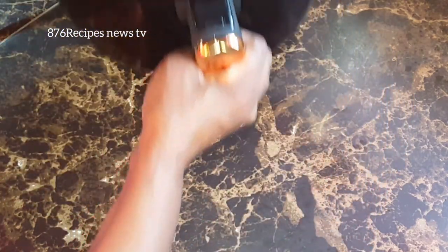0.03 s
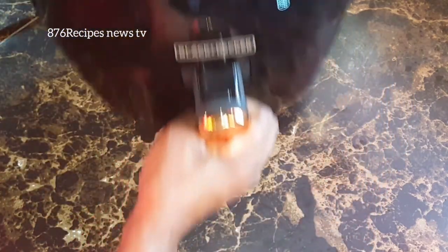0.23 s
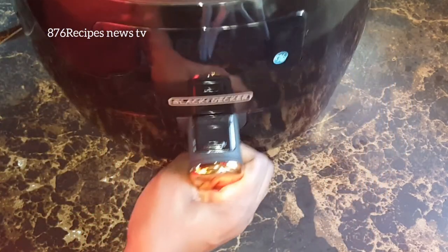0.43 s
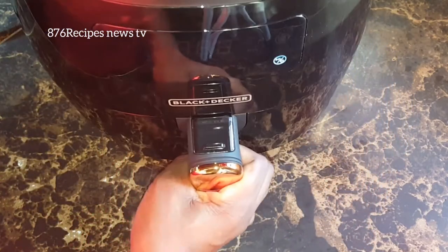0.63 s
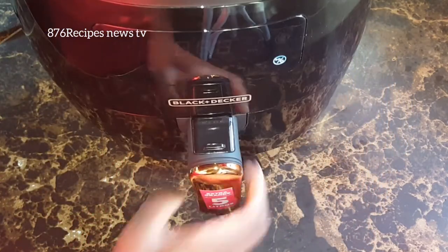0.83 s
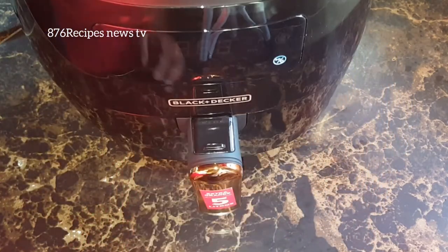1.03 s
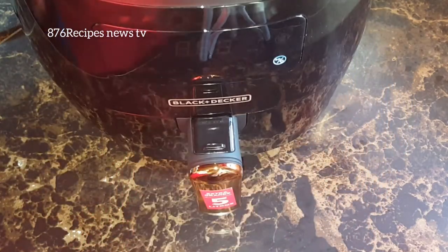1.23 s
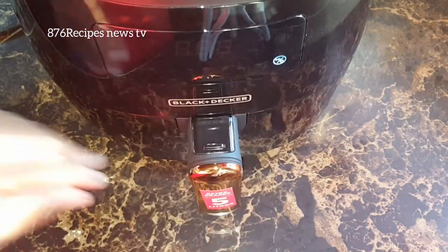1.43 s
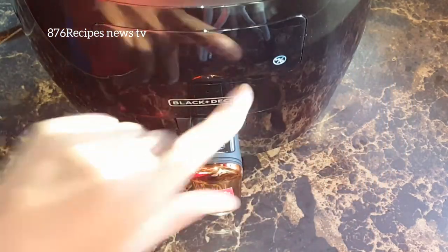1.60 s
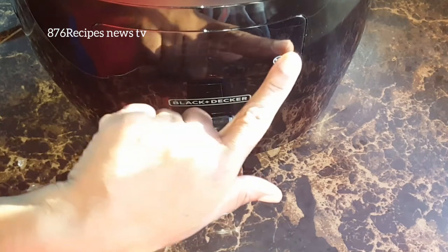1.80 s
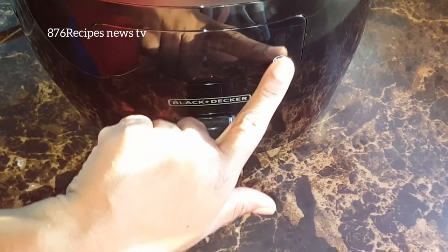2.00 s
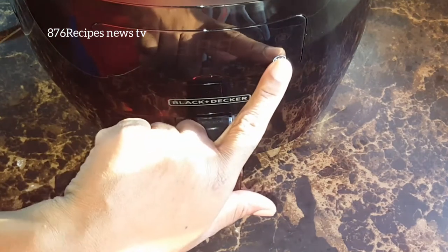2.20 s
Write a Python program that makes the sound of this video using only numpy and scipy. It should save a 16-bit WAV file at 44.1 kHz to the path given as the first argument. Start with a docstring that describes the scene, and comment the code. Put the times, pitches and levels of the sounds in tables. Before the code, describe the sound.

An air fryer basket is pushed shut, starting with a light bump and a low scrape. It knocks twice, near 0.25 and 0.45 seconds, with a hollow plastic boom, a rattling pan and ticking catches, echoing briefly in a small kitchen. Faint handle ticks and a soft brush of fingers follow until about 1.2 seconds. Quiet room noise and a faint, wavering low hum remain until 2.3 seconds.

```python
"""An air fryer basket is pushed home on a stone worktop. It starts with a light bump and scrapes along its
rails, then knocks twice, near 0.25 s and 0.45 s. Each knock is a cluster of blows that ring the hollow
plastic housing and rattle the pan, while catches tick and the fryer rocks on its feet. The basket seats,
the handle ticks and fingers brush off it. A small kitchen echoes it all, and at the end only the
background is left: steady room noise, a faint hum and a low drone that swells and fades."""
import sys
import numpy as np
from scipy import signal
from scipy.fft import rfft, irfft
from scipy.io import wavfile
from scipy.ndimage import uniform_filter1d

SR = 44100
rng = np.random.default_rng(int(sys.argv[2]) if len(sys.argv) > 2 else 0)


def wrap_up_sound(samples):
    """Save the sound to the file named by the first command line argument, as 16-bit audio."""
    columns = np.atleast_2d(samples).T
    # keep every value between -1 and 1, then stretch to whole-number steps
    tamed = np.clip(columns, -1, 1)
    steps = np.round(tamed * 32767).astype(np.int16)
    wavfile.write(sys.argv[1], SR, steps)


N = 103635

# blows of the basket: start_s, housing_db, pan_db, clatter_db, dull_above_hz, favoured_pan_hz
KNOCKS = [(0.002, -22.5, -26, -34, 300, 314), (0.175, -29, -32, -24.5, 4000, 516),
          (0.209, -26, -42, -24.5, 1670, 560), (0.2369, -8.5, 0.5, -3.5, 1180, 450),
          (0.243, -13.5, -1, -4, 6360, 900), (0.2560, 1.5, 2.5, -2, 500, 373),
          (0.267, -12.5, -3.5, -7, 4030, 604), (0.278, -4.5, -4.5, -11, 500, 560),
          (0.3903, 1, 5.5, -1.5, 1520, 512), (0.395, -12.5, 1, -1.5, 3800, 2170),
          (0.411, -6, 8.5, -18, 700, 670), (0.425, -3.5, -24, -8, 2010, 410),
          (0.4412, -12, -31, -17, 1510, 700), (0.4652, 0.5, -32, -11, 1300, 400),
          (0.488, -22, -1, -8, 4100, 296), (0.4995, -4, 9.5, -2, 870, 566),
          (0.545, -15, -12.5, -15.5, 590, 300), (0.655, -12.5, -11, -21, 580, 327)]


def undb(db):
    """Turn decibels into a number to multiply by."""
    return 10 ** (np.asarray(db) / 20)


def at_hz(points, hz):
    """Read a curve of (pitch_hz, value) points, with every octave equally wide."""
    points = np.array(points, float)
    return np.interp(np.log(hz + 1), np.log(points[:, 0]), points[:, 1])


def over_time(points):
    """Read a curve of (time_s, value) points at every sample."""
    return np.interp(np.arange(N) / SR, *np.array(points).T)


def bins():
    """The frequencies in a spectrum of the whole sound."""
    return np.arange(N // 2 + 1) * SR / N


def noise(gain):
    """Stereo noise of strength near 1, coloured by one gain for each frequency."""
    # stereo width, low where left and right are alike: pitch_hz, side_minus_mid_db
    widths = [(60, 3), (110, -24.5), (200, -14), (380, -9.5), (700, -3), (1290, 0.5), (2380, -0.5),
              (15000, 1)]
    width = undb(at_hz(widths, bins()))
    mid, side = rfft(rng.standard_normal((2, N))) * gain / np.sqrt(np.mean(gain ** 2))
    left_right = mid + np.array([[1], [-1]]) * width * side
    return irfft(left_right / np.sqrt(1 + width ** 2), N)


def wander(rate_hz):
    """A smooth random curve with a spread near 1."""
    hold = int(SR / rate_hz)
    steps = np.repeat(rng.standard_normal(N // hold + 1), hold)
    smooth = uniform_filter1d(uniform_filter1d(steps, hold), hold)[:N]
    return smooth / smooth.std()


def tone(hz, db):
    """A pure tone whose pitch and average level can move."""
    return np.sqrt(2) * undb(db) * np.sin(2 * np.pi * np.cumsum(hz) / SR)


def strike(start_s, rise_s, fade_s):
    """The loudness of a blow: a quick rise, then a fall of 60 dB every fade_s."""
    age = np.maximum(np.arange(N) / SR - start_s, 0)
    return (1 - np.exp(-age / rise_s)) * np.exp(-np.log(1000) * age / fade_s)


def ring(blows, notes, rise_s, spread_rad=0):
    """Blows (start_s, level_db) ring an object's own notes, with one level for all or one for each."""
    t, out = np.arange(N) / SR, np.zeros((2, N))
    for k, (hz, db, fade_s) in enumerate(notes):
        lag = spread_rad * (-1) ** k * np.array([[1], [-1]])  # puts left and right out of step
        note = undb(db) * strike(0, rise_s, fade_s) * np.sin(2 * np.pi * hz * t + lag)
        for start_s, blow_db in blows:
            first = int(start_s * SR)
            strength = undb(np.broadcast_to(blow_db, len(notes))[k])
            out[:, first:] += strength * note[:, :N - first]
    return out


def rubbing(levels, colour, rough_db):
    """Two surfaces rub: noise that flickers around a level curve."""
    loudness = undb(over_time(levels) + rough_db * wander(70))
    return loudness * noise(undb(at_hz(colour, bins())))


def room_noise():
    """Steady room noise whose highest hiss is stronger on the right."""
    # colour of the noise: pitch_hz, level_db
    colour = [(20, -17), (55, -8.5), (78, -23), (101, -1), (120, -12.5), (160, -5), (230, -16), (305, -10),
              (390, -11.5), (490, -15.5), (1000, -16.5), (2100, -18.5), (3000, -23.5), (5000, -33.5),
              (9500, -44), (12500, -34), (15500, -36)]
    steady = noise(undb(at_hz(colour, bins())))
    left_minus_right_db = at_hz([(9000, 0.033), (13000, -7)], bins())
    sides = undb(left_minus_right_db * np.array([[.5], [-.5]]))
    return undb(-55) * irfft(rfft(steady) * sides, N)


def hum():
    """Three faint low tones waver in pitch and level."""
    # tones of the hum: pitch_hz, level_db, waver_db
    tones = [(49.5, -59.5, 0.5), (97, -71.5, 4), (300.5, -65, 3)]
    out = 0
    for hz, db, waver_db in tones:
        pitch_hz = hz * (1 + 0.00336 * wander(7.1))
        out += tone(pitch_hz, db + waver_db * wander(10.37))
    return out


def drone():
    """One low, slightly drifting tone swells and fades."""
    # swells of the drone: time_s, level_db
    swells = [(0, -71), (.85, -60), (.97, -49), (1.1, -73), (1.22, -62.5), (1.36, -71), (1.47, -56),
              (1.55, -66), (1.64, -51.5), (1.77, -66), (1.95, -66), (2.08, -52.5), (2.19, -64.5),
              (2.3, -57)]
    return tone(hz=188 + 2.04 * wander(8.2), db=over_time(swells))


def kitchen_echo(dry):
    """The walls throw the sound back as a smooth tail; each octave fades at its own speed."""
    # strength of the echo: pitch_hz, level_db
    levels = [(60, -14.5), (200, -5.5), (500, -10), (1500, -6), (5000, -10.5), (15000, -13.5)]
    # time the echo takes to die away: pitch_hz, fade_s
    fades = [(100, 0.57), (400, 0.77), (1500, 0.65), (5000, 1), (15000, .3)]
    hz, tail = bins(), 0
    wash = rfft(noise(np.ones(len(hz))))
    octave = np.clip(np.log2((hz + 1) / 62.5), 0, 8)
    for k in range(9):
        centre_hz = 62.5 * 2 ** k
        loudness = strike(start_s=0.0045, rise_s=0.0086, fade_s=at_hz(fades, centre_hz))
        band = irfft(wash * np.maximum(1 - abs(octave - k), 0), N)
        tail += undb(at_hz(levels, centre_hz)) * band * loudness / np.sqrt(np.sum(loudness ** 2))
    return signal.fftconvolve(dry, tail, axes=1)[:, :N]


def finger_brush():
    """Fingers rub softly as they slip off the handle."""
    # loudness of the brushing: time_s, level_db
    levels = [(.58, -80), (.72, -65), (.80, -62), (.87, -64.5), (1.05, -60), (1.4, -86)]
    # colour of skin rubbing on the handle: pitch_hz, level_db
    colour = [(200, -18), (900, 9.5), (2500, 4), (6500, -7.5), (10000, -13.5), (15500, -16)]
    return rubbing(levels, colour, rough_db=1.5)


def catch_ticks():
    """The plastic catches and handle tick: tiny bursts of noise, each around one high pitch."""
    # the ticks: start_s, level_db, pitch_hz
    ticks = [(0.246, -28, 7440), (0.403, -6, 7000), (0.4242, -2, 8700), (0.5018, -4, 8300),
             (0.582, -21, 8400), (0.725, -19, 5000), (0.794, -14.5, 7000), (0.841, -19, 6300)]
    width_octaves, out = 0.71, 0
    for start_s, db, hz in ticks:
        colour = 1 / (1 + (np.log2((bins() + 1) / hz) / width_octaves) ** 2)
        out += undb(db - 39) * noise(colour) * strike(start_s, rise_s=0.0002, fade_s=0.018)
    return out


def rail_scrape():
    """The basket rubs along its rails with a low scrape as it slides and settles."""
    # loudness of the scrape: time_s, level_db
    levels = [(0, -39), (.1, -53), (.2, -41.5), (.3, -48), (.37, -36), (.48, -32), (.6, -46), (.8, -43.5),
              (.95, -49.5), (1.15, -61.5), (1.4, -104)]
    # colour of the scrape: pitch_hz, level_db
    colour = [(40, -31), (70, -20), (105, -2), (132, -10), (175, 2), (240, -14), (355, -2), (600, -18),
              (1200, -20), (3000, -34), (7000, -42), (15500, -61)]
    return rubbing(levels, colour, rough_db=2.5)


def feet_thumps():
    """The fryer rocks on its feet just after the main knocks, with soft, deep thumps."""
    # the thumps: start_s, level_db
    thumps = [(0.003, -20), (0.262, -2), (0.400, -12.5), (0.428, -2), (0.499, -5), (0.64, -15.5),
              (0.735, -21)]
    # notes of the fryer rocking on the worktop: pitch_hz, level_db, fade_s
    notes = [(101.2, 4, 0.12), (111.5, 0, 0.203)]
    return undb(-11.5) * ring(thumps, notes, rise_s=0.032)


def housing_boom():
    """Each blow makes the hollow plastic housing boom."""
    # low notes of the housing: pitch_hz, level_db, fade_s
    notes = [(149.4, -8.5, 0.3), (177.5, 0, 0.25), (189, -2, 0.21)]
    blows = [(start_s, housing_db - 17.5) for start_s, housing_db, *_ in KNOCKS]
    return ring(blows, notes, rise_s=0.0044)


def pan_ring():
    """Each blow rings the pan; notes far from the pitch that it favours come out weaker."""
    # notes of the pan: pitch_hz, level_db, fade_s
    notes = [(289.5, 7.5, 0.2), (349.1, 1.5, 0.31), (398, 2.5, 0.47), (472, 1, 0.23), (491.6, -1.5, 0.27),
             (569.2, 4.5, 0.14), (763, -9.5, 0.2), (698.5, -2.5, .19), (845, -13, 0.31), (887, -0.5, 0.28),
             (946.6, -3, 0.15), (1108, -8.5, .35), (1549, -6, 0.11), (2110, -10.5, 0.099)]
    focus_octaves, far_drop_db = 0.28, 15
    pitches_hz, blows = np.array(notes)[:, 0], []
    for start_s, _, pan_db, _, _, favoured_hz in KNOCKS:
        octaves_away = np.log2(pitches_hz / favoured_hz)
        drop_db = far_drop_db * (1 - np.exp(-.5 * (octaves_away / focus_octaves) ** 2))
        blows.append((start_s, pan_db - 28.5 - drop_db))
    return ring(blows, notes, rise_s=0.00099, spread_rad=0.1)


def panel_clatter():
    """Each blow sets off a crack and a short clatter of the panels; softer contacts are duller."""
    # the panels' many short notes, blurred into noise: pitch_hz, level_db
    panels = [(90, -4.5), (200, -3.5), (450, 3.5), (800, -1.5), (1300, -8.5), (2200, -15), (4500, -26),
              (8000, -33.5), (15500, -44)]
    colour = undb(at_hz(panels, bins()))
    rise_s, out = 0.00048, 0
    for start_s, _, _, clatter_db, dull_above_hz, _ in KNOCKS:
        crack = undb(-3.5) * strike(start_s, rise_s, fade_s=0.021)
        clatter = strike(start_s, rise_s, fade_s=0.2)
        treble_cut = signal.butter(1, dull_above_hz, fs=SR, output="sos")
        out += undb(clatter_db - 17) * signal.sosfilt(treble_cut, noise(colour) * (crack + clatter))
    bass_cut = signal.butter(3, 130, "high", fs=SR, output="sos")
    return signal.sosfilt(bass_cut, out)


def scene():
    """The basket, its echo and the background together, a little louder on the left."""
    knocks = feet_thumps() + housing_boom() + pan_ring() + panel_clatter()
    basket = knocks + catch_ticks() + rail_scrape() + finger_brush()
    mix = basket + kitchen_echo(basket) + room_noise() + hum() + drone()
    return mix * undb([[0.43], [-0.43]])


def record(dry):
    """Cut away the very highest treble."""
    top_hz = 15750
    return signal.sosfilt(signal.ellip(10, .2, 80, top_hz, fs=SR, output="sos"), dry)


dry = scene()
out = record(dry)
wrap_up_sound(out)
```